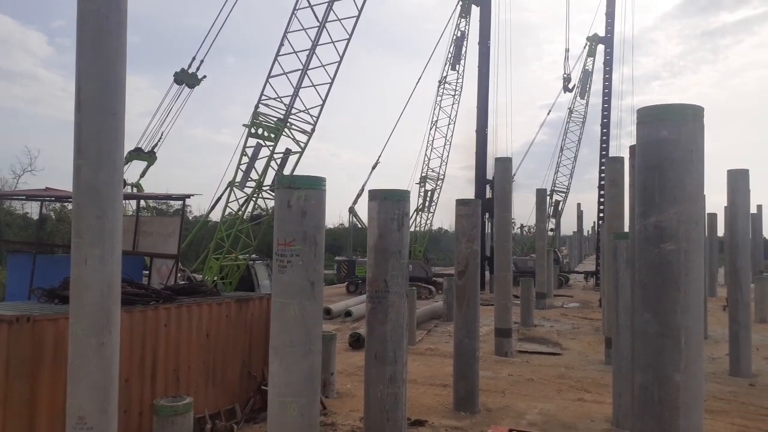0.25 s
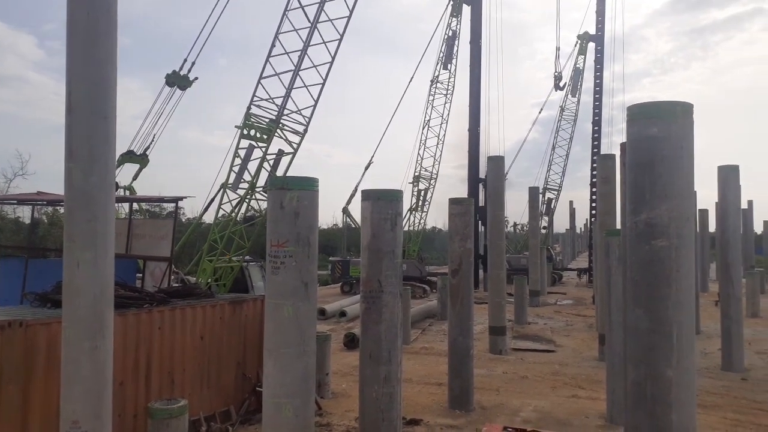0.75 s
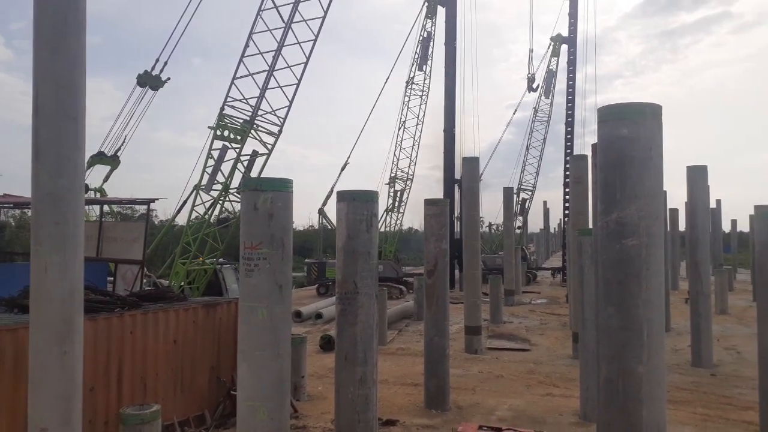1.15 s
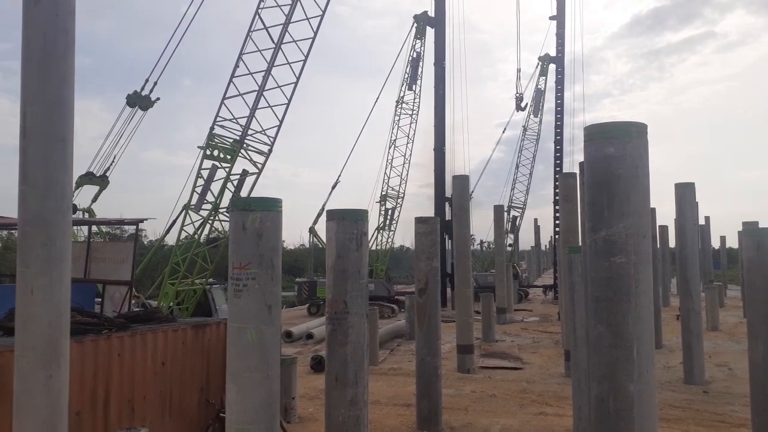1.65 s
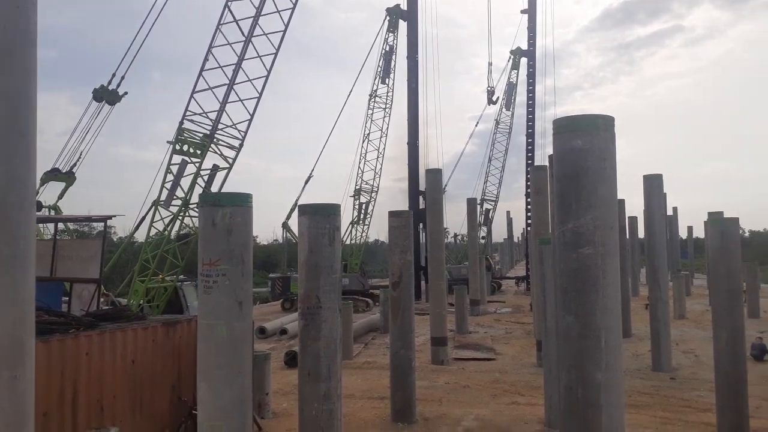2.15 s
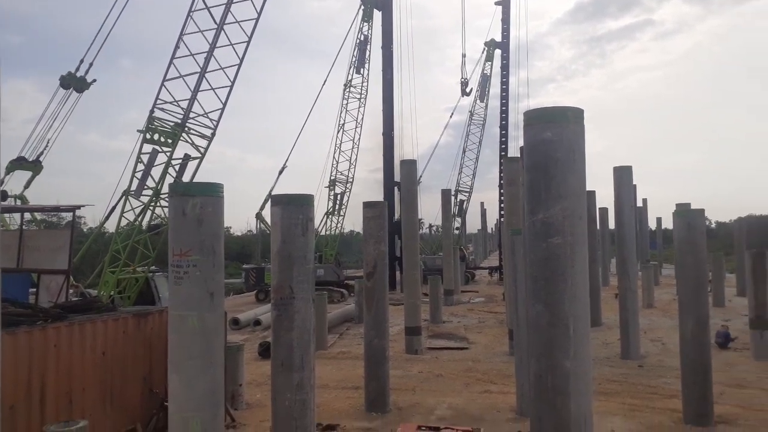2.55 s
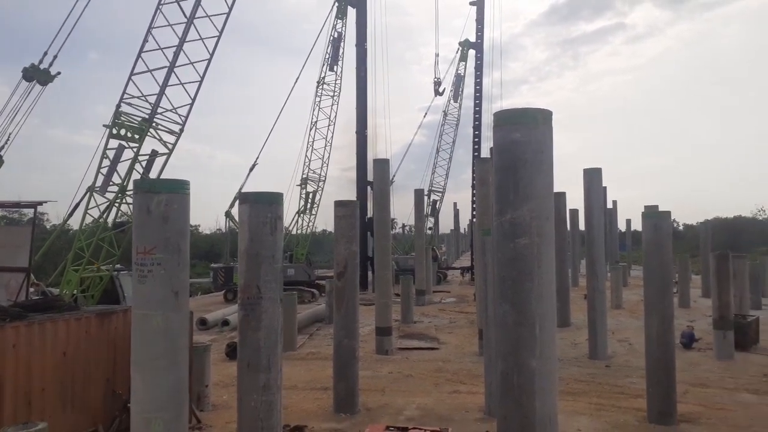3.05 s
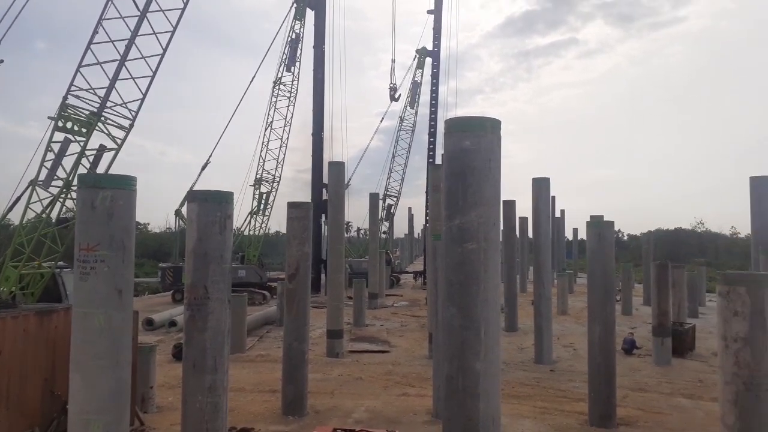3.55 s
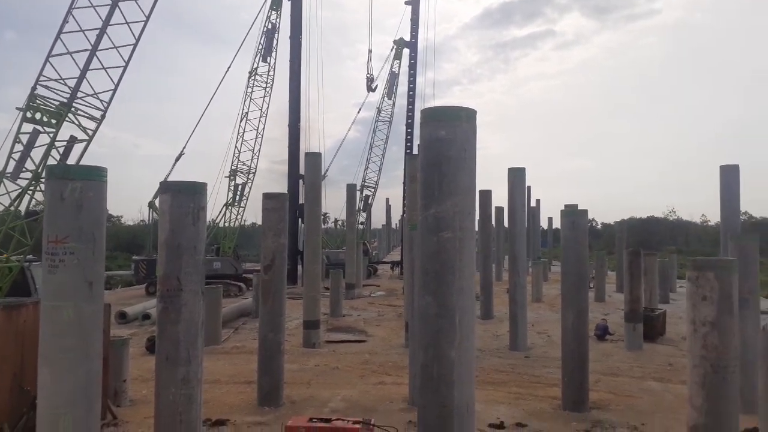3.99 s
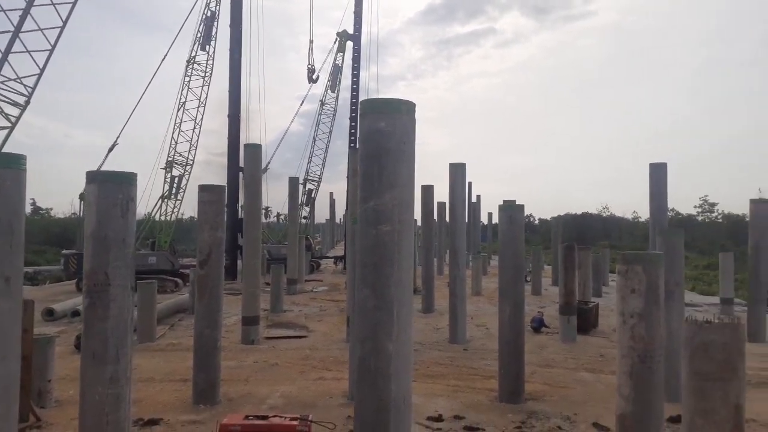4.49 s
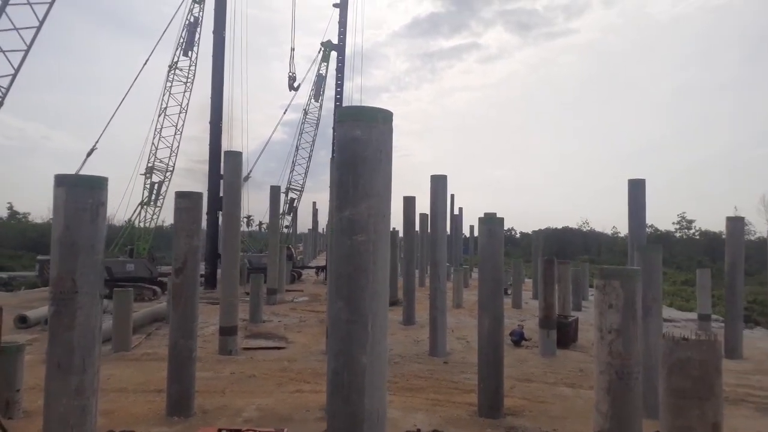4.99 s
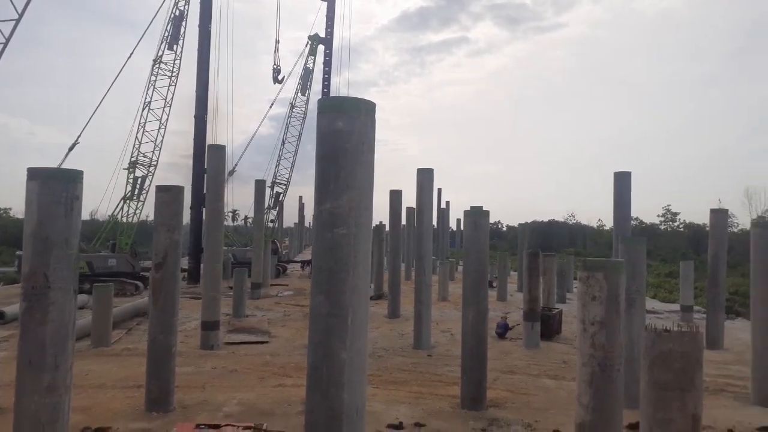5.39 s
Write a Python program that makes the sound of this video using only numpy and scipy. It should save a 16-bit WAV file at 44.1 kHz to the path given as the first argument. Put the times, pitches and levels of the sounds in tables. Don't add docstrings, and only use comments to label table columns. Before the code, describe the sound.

Slow, regular pile driving: a pop and rush of air, a hard steel clank and ground thump, then a long scattered echo, three times.

```python
import sys
import numpy as np
from scipy import signal
from scipy.fft import irfft, next_fast_len
from scipy.io import wavfile
from scipy.ndimage import uniform_filter1d

SR = 44100
rng = np.random.default_rng(int(sys.argv[2]) if len(sys.argv) > 2 else 0)


def decibels_to_gain(level_db):
    exponent = np.asarray(level_db, float) / 20
    return 10 ** exponent


def bounce(signal):
    frames = np.transpose(np.atleast_2d(signal))
    limited = np.clip(frames, -1, 1)
    pcm = np.round(limited * 32767).astype(np.int16)
    wavfile.write(sys.argv[1], SR, pcm)


N = 248283

STROKE_S, EARLIER_DB = 1.601, 1.6
LEAD_S = 0.5

# frequency in Hz, level in dB per Hz.
HUM_COLOUR = [(18, -30), (30, 3.5), (112, -2.5), (354, -12.5), (437, -16), (486, -15.5), (740, -9.5),
              (889, -19), (1190, -16.5), (2350, -24), (6210, -31.5), (8080, -43), (9210, -58), (12600, -54),
              (16000, -57)]
# frequency in Hz, level in dB rms.
GENERATOR_LINES = [(50, -65.5), (100, -57.5), (201, -64.5), (251, -66), (302, -68), (652, -69.5),
                   (2500, -74.5), (2720, -80)]
# start in seconds, length in seconds, from Hz, to
# Hz, level in dB.
BIRD_WHISTLES = [(2.58, 0.02, 6150, 6200, -76.5), (2.634, .014, 5200, 5030, -79),
                 (2.71, .032, 5400, 5050, -69), (2.75, 0.013, 4670, 4550, -70),
                 (2.764, .026, 4400, 4050, -71), (2.794, .025, 3850, 3600, -73)]
# start in seconds, level in dB, frequency in Hz, t60 in seconds.
METAL_PINGS = [
    (2.908, -30, 5500, 0.054),
    (5.4141, -52.5, 6180, 0.081),
    (5.4949, -50.5, 6140, 0.092),
    (5.5902, -49, 6120, 0.098),
]
# time in seconds, level in dB, frequency in Hz.
CLOSE_TICK = (5.4068, -35, 15000)

# frequency in Hz, t60 of the near piles in seconds,
# t60 of the far site in seconds, share of the far site in dB, level in dB.
SITE_SCATTER = [(60, .5, 1.7, -11, -1.5), (212.5, 1, 3, 1, 0.5), (450, 1, 2.36, -2.5, -4),
                (676, 0.94, 2.22, -4, -4.5), (850, 0.74, 2.08, -4, -4), (1500, 0.89, 1.9, -5, -3.5),
                (4000, 0.56, 1.58, -6.5, 0.5), (8000, 0.64, 1.27, -7.5, -5), (11000, 0.49, 1.3, -11, -3.5),
                (15000, 0.49, 0.76, -12.5, -7.5)]
# frequency in Hz, likeness from 0 to 1.
DIRECT_LIKENESS = [(60, 1.), (500, 0.97), (1100, 0.95), (2000, 0.6), (2800, .42), (4000, 0.3), (8000, 0.4),
                   (15000, 0.4)]
# frequency in Hz, likeness from 0 to 1.
FAR_LIKENESS = [(60, 0.995), (180, 0.99), (550, 0.94), (1380, .68), (2070, 0.33), (2800, .15), (4970, 0.1),
                (15000, 0.1)]

# start in seconds, pipe level in dB, upper tones relative to the pipe in dB.
AIR_EVENTS = [
    (1.209, -26, -2),
    (1.28, -30, 5),
    (1.329, -7.5, -12),
    (2.829, -18.5, -9),
    (2.901, -21.5, -7),
    (2.939, -9, -4.5),
    (4.438, -17.5, -3.5),
    (4.512, -25.5, 4.5),
    (4.546, -10.5, -0.5),
]
# hiss in dB, rumble relative to the pipe in dB,
# rise in seconds, hold in seconds, t60 in seconds.
AIR_SHAPES = [(-35.5, -26.5, 0.014, 0.034, .11), (-30, -23.5, .012, 0.039, .125),
              (-24.5, -21, 0.013, 0.096, .1)]
# resonance in Hz, width in Hz, level in dB.
PIPE_MODES = [(686, 210, -0.5), (1067, 24, 1), (1560, 110, -9), (2100, 46, -14.5), (3600, 57, -18)]
# resonance in Hz, width in Hz, level in dB.
UPPER_MODES = [(756, 350, 0.5), (1060, 170, 4.5), (1320, 300, -6), (1520, 260, 0.5), (2100, 400, -14)]
# resonance in Hz, width in Hz, level in dB.
RUMBLE_MODES = [(189, 110, -1.5), (323, 280, 2)]
# frequency in Hz, level in dB per Hz.
PIPE_COLOUR = [(35, -40.5), (60, -11), (145, -14), (266, -9), (449, -5), (613, -2.5), (865, -14),
               (1120, -11), (3000, -20.5), (3900, -44), (6600, -120)]
# frequency in Hz, level in dB per Hz.
HISS_COLOUR = [(1290, -27), (2200, 1.5), (2530, -5.5), (3570, -2), (4460, -7), (5900, -5), (8070, -10.5),
               (9510, -26.5), (11700, -17.5), (14600, -24), (15700, -27)]
# start in seconds, level in dB, frequency in Hz.
CYLINDER_KNOCKS = [(1.217, -19, 630), (1.227, -19, 614), (1.235, -20, 638), (1.241, -17.5, 562),
                   (1.315, -21, 733), (1.338, -7.5, 663), (1.362, -13, 594), (1.381, -8.5, 618),
                   (1.408, -16.5, 680), (1.428, -14, 637), (1.452, -6, 632), (1.463, -17, 547),
                   (2.835, -18, 626), (2.884, -25, 644), (2.923, -28, 560), (2.955, -10, 629),
                   (2.972, -8, 653), (3.015, -17, 620), (3.051, -14, 668), (3.065, -6.5, 574),
                   (3.087, -15, 765), (4.439, -25.5, 493), (4.446, -15, 606), (4.458, -17, 640),
                   (4.56, -16, 637), (4.58, -14, 604), (4.615, -9, 694), (4.627, -7, 646),
                   (4.681, -17, 582), (4.713, -18, 630)]
# level in dB, one per stroke.
PORT_PUFF_DB = [-34.5, -38, -38.5]

# start in seconds, level in dB.
PILE_THUMPS = [
    (1.4701, 5.1),
    (3.0896, 4.8),
    (4.7034, 4.6),
]
# frequency in Hz, level in dB, t60 in seconds.
GROUND_MODES = [(67.7, -5.6, .169), (84.1, 0, .164)]
# delay in seconds, level in dB.
GROUND_RETURNS = [(.0411, -10.2), (.0828, -15.3)]

# start in seconds, level in dB, top band level in dB.
METAL_CRACKS = [
    (1.3327, -17, -34),
    (1.4555, -7, -22.5),
    (2.914, -25, -50),
    (2.9553, -16, -35.5),
    (3.0747, -5, -24.5),
    (4.555, -22, -42.5),
    (4.687, -7, -25),
]
# rise in seconds, hold in seconds, t60 in seconds.
CRACK_ENVELOPE = (0.0021, 0.004, .04)
# frequency in Hz, level in dB per Hz.
SNAP_COLOUR = [(900, -29.5), (1500, -4.5), (7000, -0.5), (9500, -18), (16000, -27.5)]
# frequency in Hz, level in dB per Hz.
SNAP_TOP_COLOUR = [(9500, -28.0), (11500, 1.5), (15800, 0.5)]

# start in seconds, clang in dB, fizz in dB.
RAM_BLOWS = [(1.325, -13, -32), (1.4456, -7, -15.5), (1.4568, -4.5, -23), (1.504, -14, -22.5),
             (2.943, -19, -28), (3.064, -9, -16.5), (3.071, -4.5, -16.5), (3.121, -14, -18.5),
             (4.549, -26, -28), (4.676, -20, -15.5), (4.69, -6, -22.5), (4.742, -11, -22.5)]
# rise in seconds, hold in seconds, t60 in seconds.
BLOW_SHAPES = [(.01, .006, .18), (0.01, 0.0078, 0.2), (0.0048, 0.0031, 0.15), (0.0072, 0.015, .07)]
# start in seconds, clang in dB, fizz in dB.
LEAD_RATTLES = [
    (0.0657, -37, -32),
    (3.266, -19.5, -30),
    (4.824, -19.5, -29),
]
# rise in seconds, hold in seconds, t60 in seconds.
RATTLE_ENVELOPE = (0.0068, 0.0053, 0.055)
# resonance in Hz, width in Hz, level in dB.
ANVIL_MODES = [(626, 67, 2), (726, 260, -4.5), (1123, 90, -6), (1567, 69, -5.5), (2190, 180, -6.5)]
# frequency in Hz, level in dB per Hz.
ANVIL_COLOUR = [(88, -39.5), (150, -11.5), (314, -0.5), (639, -4), (2240, -8), (3150, -21), (3500, -9),
                (4550, -29), (7700, -120)]
# frequency in Hz, level in dB per Hz.
FIZZ_COLOUR = [(1290, -32.5), (2200, -11), (2390, -7.5), (2470, -3.5), (2930, -5), (4730, -4.5),
               (5660, -0.5), (7930, -7), (9430, -20), (12600, -14.5), (15100, -24), (15700, -28)]

# frequency in Hz, left minus right in dB.
PORT_COLOUR = [(60, 0), (110, 1.5), (200, -1), (380, 1), (700, -0.5), (1290, 2.5), (2380, 1.5), (4400, -3),
               (8120, -4.5), (15000, 13)]
# time in seconds, lag of the left port in microseconds.
PORT_LAG = [(0, 47), (1.4, 45), (2.4, 16), (3.0, -16.5), (4.0, -77.5), (4.6, -110), (5.63, -135)]


def evened(x):
    return x / np.sqrt(np.mean(x ** 2) + 1e-20)


def read(points, hz, axis=1):
    rows = np.transpose(points)
    return np.interp(np.log(hz + 1), np.log(rows[0] + 1), rows[axis])


def noise_pair(size, colour, same, modes=(), body_db=0.):
    hz = np.fft.rfftfreq(size, 1 / SR)
    a, b, c, d = rng.standard_normal((len(hz), 4)).T
    like = np.clip(read(same, hz), 0, 1)
    power = decibels_to_gain(2 * (read(colour, hz) + body_db))
    for mode_hz, width_hz, db in modes:
        power = power + decibels_to_gain(2 * db) / (1 + (2 * (hz - mode_hz) / width_hz) ** 2) ** 2
    left = a + 1j * b
    right = like * left + np.sqrt(1 - like ** 2) * (c + 1j * d)
    return evened(irfft([left, right] * np.sqrt(power), size))


def flutter(size, hz, db):
    span = int(SR / hz)
    wobble = uniform_filter1d(uniform_filter1d(rng.standard_normal(size), span), span)
    return decibels_to_gain(db * evened(wobble))


def bursts(rows, t, axis):
    power = np.zeros(len(t))
    for row in rows:
        rise, hold, t60 = np.maximum(row[3:], .001)
        u = t - row[0]
        fall_db = 60 * np.clip(u - rise - hold, 0, 2) / t60
        power += np.clip(u / rise, 0, 1) ** 4 * decibels_to_gain(2 * (row[axis] - fall_db))
    return np.sqrt(power)


def staged(rows, stages):
    full = [(*row, *stages[k % len(stages)]) for k, row in enumerate(rows)]
    first = full[:len(stages)]
    earlier = [(s - STROKE_S, a + EARLIER_DB, b + EARLIER_DB, *rest) for s, a, b, *rest in first]
    return earlier + full


def add(mix, s, sound):
    mix[round(s * SR):][:len(sound)] += sound


def generator(t):
    out = decibels_to_gain(-47) * noise_pair(len(t), HUM_COLOUR, FAR_LIKENESS) * flutter(len(t), hz=4, db=0.84)
    for hz, db in GENERATOR_LINES:
        waver = flutter(len(t), hz=3.52, db=3.0)
        out += decibels_to_gain(db + 2.0) * waver * np.sin(2 * np.pi * (hz * t + rng.random()))
    return out


def bird(t):
    out = np.zeros(len(t))
    for s, length, from_hz, to_hz, db in BIRD_WHISTLES:
        hz = np.linspace(from_hz, to_hz, round(length * SR))
        whistle = np.hanning(len(hz)) * np.sin(2 * np.pi * np.cumsum(hz) / SR)
        add(out, s - t[0], decibels_to_gain(db) * whistle)
    return out


def small_metal(t):
    out = np.zeros((2, len(t)))
    for s, db, hz, t60 in METAL_PINGS:
        u = np.clip(t - s, 0, 1)
        pair = np.sin(2 * np.pi * hz * u) + 0.6 * np.sin(2 * np.pi * (hz + 75) * u)
        out += decibels_to_gain(db - 60 * u / t60) * pair * np.minimum(u / 0.002, 1)
    tick_s, tick_db, tick_hz = CLOSE_TICK
    u = t - tick_s
    tick = np.exp(-(u / 0.000088) ** 2) * np.cos(2 * np.pi * tick_hz * u)
    return out + decibels_to_gain([[tick_db], [tick_db - 4]]) * tick


def site(x, size):
    shape = dict(fs=SR, nperseg=size, noverlap=size * 3 // 4)
    hz, t, z = signal.stft(x, **shape)
    near, far, share_db, level_db = (read(SITE_SCATTER, hz, axis=k)[:, None] for k in range(1, 5))
    slope = decibels_to_gain(-120 * t / near) / near + decibels_to_gain(2 * share_db - 120 * t / far) / far
    slope = slope * (t > t[1])
    source = uniform_filter1d(abs(z) ** 2, size=3, axis=0)
    power = signal.fftconvolve(source, slope / slope.sum(1, keepdims=True), axes=1)[:, :len(t)]
    white = signal.stft(noise_pair(len(x), [(20, 0), (20000, 0)], FAR_LIKENESS), **shape)[2]
    paths = white / np.sqrt(np.mean(abs(white) ** 2))
    return signal.istft(paths * decibels_to_gain(level_db) * np.sqrt(abs(power)), **shape)[1][:, :len(x)]


def cylinder(t):
    low_end_db_per_s = 3.5
    rows = staged([(s, db, db + upper_db) for s, db, upper_db in AIR_EVENTS], AIR_SHAPES)
    tones = [(s, db, upper_db, *shape) for s, db, upper_db, _, _, *shape in rows]
    ends = [(s, hiss_db, db + low_db + low_end_db_per_s * s, *shape)
            for s, db, _, hiss_db, low_db, *shape in rows]

    pipe = noise_pair(len(t), PIPE_COLOUR, DIRECT_LIKENESS, PIPE_MODES, body_db=-1.5)
    pipe = pipe * flutter(len(t), hz=90, db=0.5)
    upper = noise_pair(len(t), PIPE_COLOUR, DIRECT_LIKENESS, UPPER_MODES, body_db=-39.5)
    upper = upper * flutter(len(t), hz=118.3, db=0.5)
    rumble = noise_pair(len(t), PIPE_COLOUR, DIRECT_LIKENESS, RUMBLE_MODES, body_db=-40)
    hiss = noise_pair(len(t), HISS_COLOUR, DIRECT_LIKENESS) * flutter(len(t), hz=150, db=-0.5)

    column = bursts(tones, t, axis=1) * pipe + bursts(tones, t, axis=2) * upper
    column = column + bursts(ends, t, axis=2) * rumble
    return decibels_to_gain(-11.5) * column + decibels_to_gain(-3.0) * bursts(ends, t - .002, axis=1) * hiss


def knocks(t):
    out = np.zeros(len(t))
    u = np.arange(3000) / SR
    for s, db, hz in CYLINDER_KNOCKS:
        ring = np.sin(2 * np.pi * hz * u) + decibels_to_gain(-9.5) * np.sin(2 * np.pi * 1.95 * hz * u)
        soft_start = 1 - np.exp(-u / 0.0035)
        add(out, s - t[0], decibels_to_gain(db + 5.0 - 60 * u / 0.04) * soft_start * ring)
    pops = AIR_EVENTS[::len(AIR_SHAPES)]
    for (s, *_), db in zip(pops, PORT_PUFF_DB):
        swell = np.sin(np.pi * u / u[-1]) ** 0.41
        add(out, s - t[0], -decibels_to_gain(db) * np.sin(2 * np.pi * 102.5 * u) * swell)
    return out


def thump(t):
    out = np.zeros(len(t))
    first_s, first_db = PILE_THUMPS[0]
    for s, db in [(first_s - STROKE_S, first_db), *PILE_THUMPS]:
        for delay, path_db in [(0.00077, 0.0091), *GROUND_RETURNS]:
            u = np.clip(t - s - delay, 0, 1)
            swell = (1 - np.exp(-u / .015)) ** 2
            for hz, mode_db, t60 in GROUND_MODES:
                out -= swell * decibels_to_gain(db + path_db + mode_db - 60 * u / t60) * np.sin(2 * np.pi * hz * u)
    return out


def cracks(t):
    rows = [(*row, *CRACK_ENVELOPE) for row in METAL_CRACKS]
    snap = noise_pair(len(t), SNAP_COLOUR, DIRECT_LIKENESS)
    top = noise_pair(len(t), SNAP_TOP_COLOUR, DIRECT_LIKENESS)
    return decibels_to_gain(-8.0) * bursts(rows, t, axis=1) * snap + decibels_to_gain(2.0) * bursts(rows, t, axis=2) * top


def anvil(t):
    rows = staged(RAM_BLOWS, BLOW_SHAPES) + [(*row, *RATTLE_ENVELOPE) for row in LEAD_RATTLES]
    chatter = flutter(len(t), hz=463, db=2.0)
    clang = noise_pair(len(t), ANVIL_COLOUR, DIRECT_LIKENESS, ANVIL_MODES, body_db=-1.5)
    clang = decibels_to_gain(-9.5) * bursts(rows, t + 0.004, axis=1) * clang
    fizz = noise_pair(len(t), FIZZ_COLOUR, DIRECT_LIKENESS)
    fizz = decibels_to_gain(-2.5) * bursts(rows, t + 0.003, axis=2) * fizz
    return chatter * (clang + fizz)


def scene():
    lead = round(LEAD_S * SR)
    t = (np.arange(next_fast_len(N + lead, True)) - lead) / SR
    background = generator(t) + bird(t) + small_metal(t)
    hammer = cylinder(t) + knocks(t) + cracks(t) + anvil(t)
    ground = thump(t)
    scatter = site(hammer.mean(0), size=1024) + site(decibels_to_gain(-10.5) * ground, size=4096)
    return (background + scatter + hammer + ground)[:, lead:lead + N]


def roll_off(x):
    return signal.sosfilt(signal.butter(12, 16140, fs=SR, output="sos"), x)


def record(dry):
    hz, t, z = signal.stft(dry, SR, nperseg=1024, noverlap=768)
    lag_s = np.interp(t, *np.transpose(PORT_LAG)) / 10 ** 6
    port = decibels_to_gain(read(PORT_COLOUR, hz) / 2)[:, None] * np.exp(-1j * np.pi * np.outer(hz, lag_s))
    rumble_cut = 1 / (1 + (36 / (hz[:, None] + 1)) ** 6)
    below_edge = (hz < 15950)[:, None]
    heard = z * [port, 1 / port] * rumble_cut * below_edge
    both = signal.istft(heard, SR, nperseg=1024, noverlap=768)[1][:, :N]
    limited = both / (1 + abs(both / .84) ** 8) ** (1 / 8)
    return roll_off(limited)


dry = scene()
out = record(dry)
bounce(out)
```